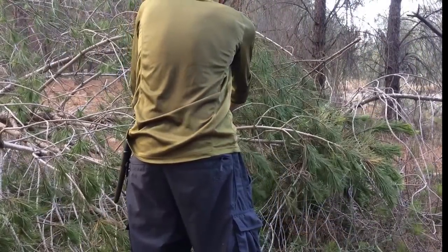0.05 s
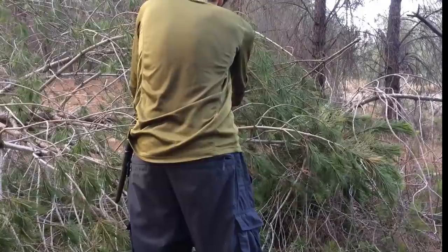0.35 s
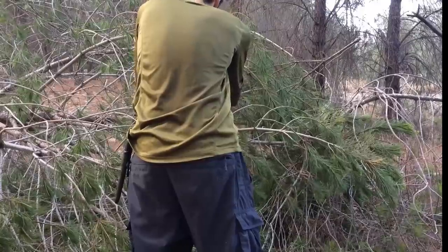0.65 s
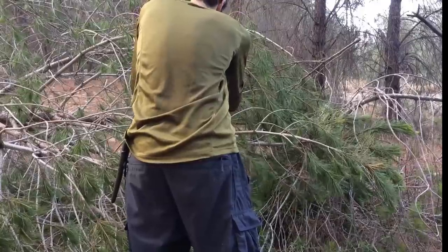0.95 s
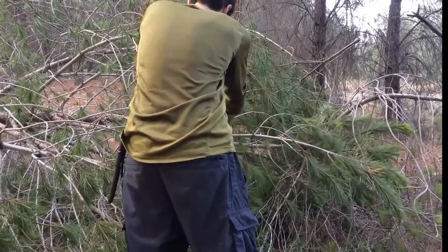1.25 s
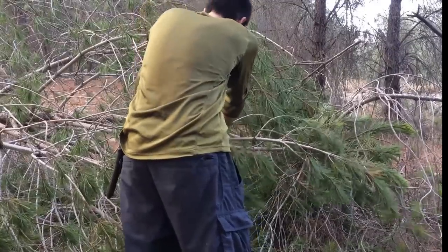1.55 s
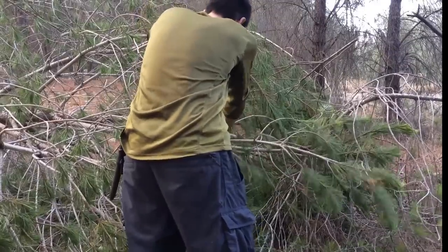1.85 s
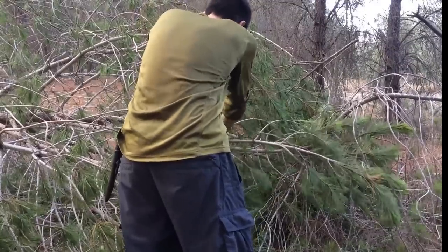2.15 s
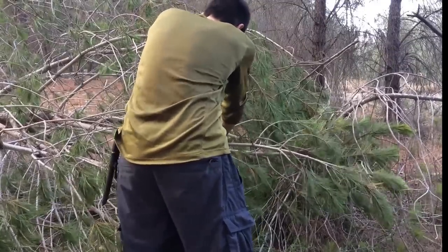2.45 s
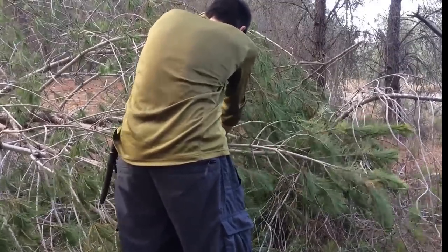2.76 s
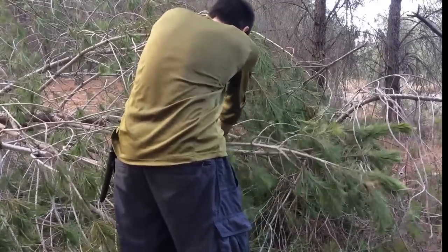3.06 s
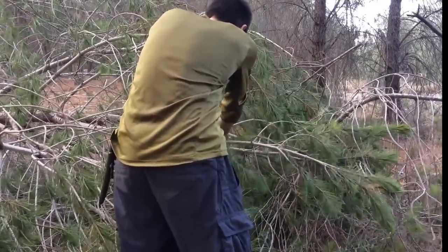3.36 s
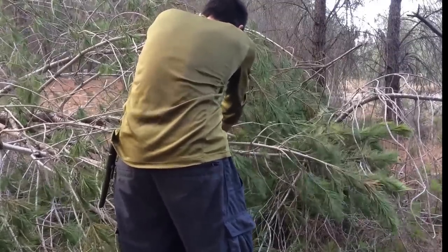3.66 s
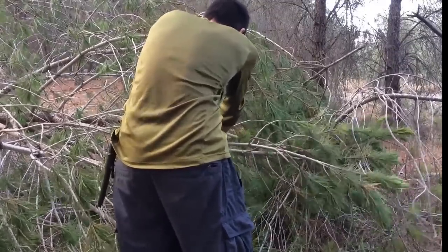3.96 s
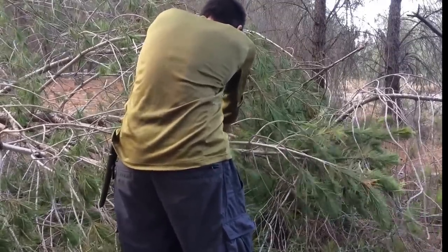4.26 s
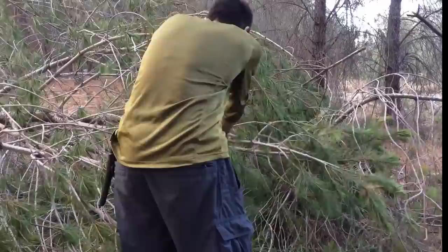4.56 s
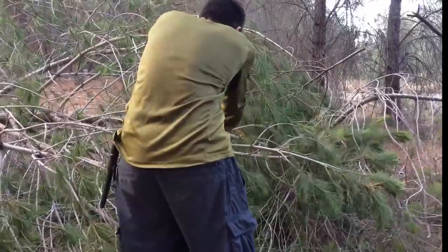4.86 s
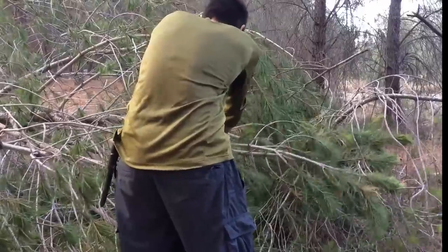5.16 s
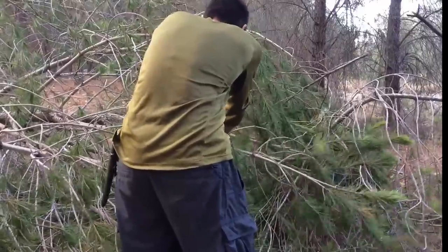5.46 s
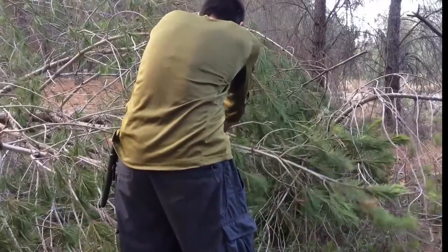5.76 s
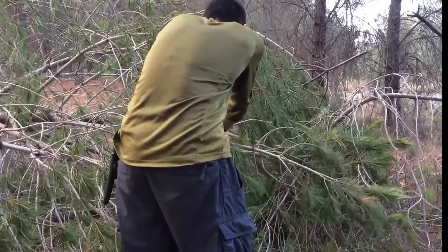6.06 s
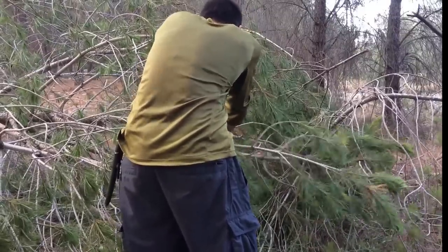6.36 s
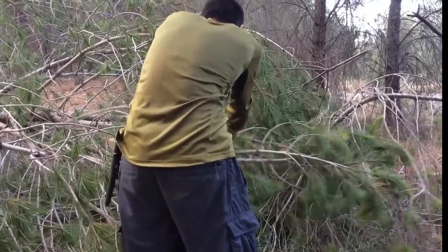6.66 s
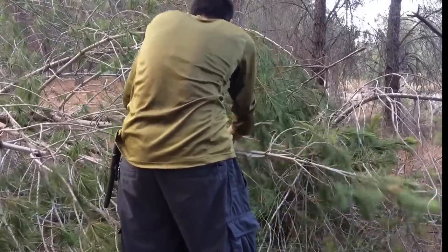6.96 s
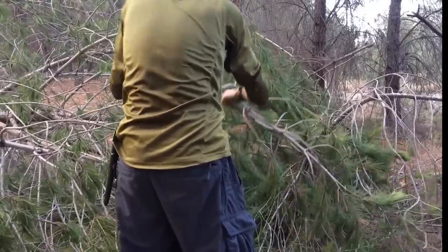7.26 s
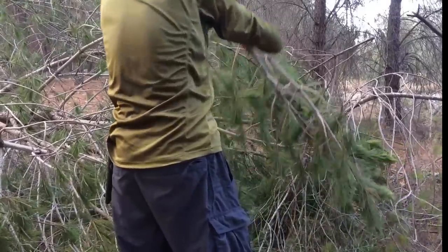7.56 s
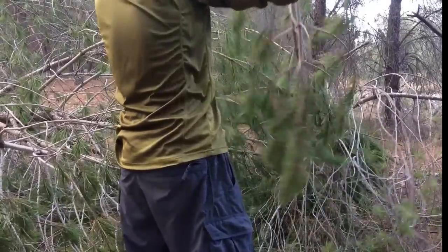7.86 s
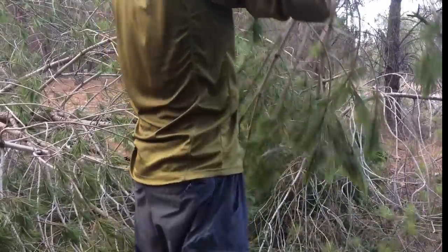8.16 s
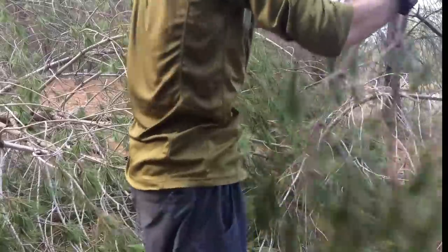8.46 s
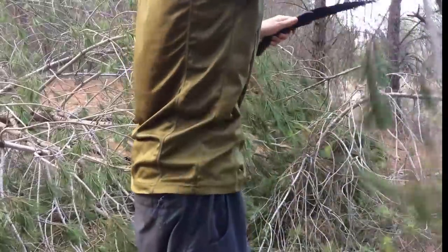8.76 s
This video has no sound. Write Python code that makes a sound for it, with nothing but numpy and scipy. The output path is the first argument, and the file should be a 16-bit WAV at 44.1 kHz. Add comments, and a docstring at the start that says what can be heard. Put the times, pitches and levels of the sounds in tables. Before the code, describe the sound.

Quick, ringing saw strokes cut wood outdoors, with one sharp crack, then twigs tick and needles rustle as the branch is swung aside.

```python
"""In a forest, a few metres away, a folding saw cuts a green pine branch in quick pushes and pulls.
Its teeth tear the wood fibres and make the blade ring. The branch cracks, comes free with a knock,
then is lifted and swung, with ticking twigs and rustling needles. Trunks and brush scatter the
sounds of the wood and two faint bird whistles, over a distant rumble, roar and hum."""
import sys
import numpy as np
from scipy import signal
from scipy.fft import rfft, irfft
from scipy.io import wavfile
from scipy.ndimage import uniform_filter1d

SR = 44100
rng = np.random.default_rng(int(sys.argv[2]) if len(sys.argv) > 2 else 0)


def bounce(signal):
    """Save signal as a 16-bit WAV file at the path given by the first command-line argument."""
    frames = np.transpose(np.atleast_2d(signal))
    limited = np.clip(frames, -1, 1)
    pcm = np.round(limited * 32767).astype(np.int16)
    wavfile.write(sys.argv[1], SR, pcm)


N = 388962
T = np.arange(N) / SR
TOP_HZ = 15350  # upper edge of the treble

# saw strokes, and one faint rustle just after the crack:
# start/s, end/s, level/dB, bite at entry (0-1), depth/dB (+ in solid wood, - near the bark)
STROKES_AND_RUSTLE = [ (1.16, 1.315, -47.5, .03, -3.5), (1.598, 1.705, -48, 0.16, -5),
                      (1.751, 1.882, -47.5, .08, -2.5), (1.953, 2.057, -43.5, 0.42, -0.5),
                      (2.118, 2.226, -44.5, 0.42, -5), (2.325, 2.444, -48.5, 0.78, 3),
                      (2.482, 2.593, -51.5, 0.16, 0.5), (2.684, 2.805, -48, 0.77, 4),
                      (2.851, 2.964, -50.5, 0.5, 1.5), (3.078, 3.195, -50, .7, 3.5),
                      (3.225, 3.345, -55, 0.5, 2.5), (3.459, 3.574, -55, 1, 3), (3.618, 3.73, -55, 0.26, 1),
                      (3.896, 4.002, -47, 0.57, -1.5), (4.052, 4.17, -56, 0.15, 4.5),
                      (4.276, 4.364, -52, 0.21, 4), (4.405, 4.508, -50, 0.15, 2),
                      (4.690, 4.797, -49.5, 0.66, -0.5), (4.848, 4.959, -55.5, .1, 2),
                      (5.109, 5.232, -58, 0.17, 4), (5.270, 5.366, -51, 0.34, 0),
                      (5.680, 5.744, -59, .05, -0.5), (6.216, 6.318, -46, 0.049, 1.5),
                      (6.363, 6.462, -48.5, 0.61, -0.5), (6.561, 6.627, -47, 1, -1),
                      (6.707, 6.769, -44.5, 0.14, -19)]


def undb(db):
    """Turn decibels into a gain to multiply by."""
    return 10 ** (np.asarray(db) / 20)


def unit(x):
    """Scale x to an average (rms) level of 1."""
    return x / np.sqrt(np.mean(x ** 2))


def add(out, start_s, x):
    """Mix x into out from the given time."""
    i = int(start_s * SR)
    out[i:i + len(x)] += x[:N - i]


def convolve(x, response):
    """Pass x through a filter, given as its response to one click."""
    return signal.fftconvolve(x, response)[:len(x)]


def colour(points, size=8192):
    """Make a filter's click response, with energy 1, from a tone curve of (f/Hz, level/dB) points."""
    hz, db = np.transpose(points)
    bin_hz = np.maximum(np.arange(size // 2 + 1) * SR / size, 1)
    gain = undb(np.interp(np.log(bin_hz), np.log(hz), db))
    cepstrum = irfft(np.log(gain))
    # fold the second half onto the first, so nothing sounds before the click
    cepstrum[1:size // 2] *= 2
    cepstrum[size // 2 + 1:] = 0
    response = irfft(np.exp(rfft(cepstrum)))
    return response / np.linalg.norm(response)


def resonate(x, hz, width):
    """Keep the band around hz; the narrower it is, the longer it rings."""
    w = 2 * np.pi * min(hz, TOP_HZ) / SR
    a = np.sin(w) * width / (2 * hz)
    return signal.lfilter([a, 0, -a], [1 + a, -2 * np.cos(w), 1 - a], x + 1e-18)


def walk(per_s):
    """A smooth random drift, about 1 in size."""
    hold = int(SR / per_s)
    steps = np.repeat(rng.standard_normal(N // hold + 1), hold)[:N]
    return unit(uniform_filter1d(steps, hold))


def grains(per_s, spread_db):
    """Tiny clicks of uneven size at random times."""
    size = undb(spread_db * np.minimum(rng.exponential(size=N), 5))
    return unit((rng.random(N) < per_s / SR) * size * rng.choice([-1, 1], N))


def background(roar_db=-68.5, air_db=-74):
    """A low rumble, a far roar that narrows in tone as it swells, and the hiss of still air."""
    # tone curves of the three sounds: f/Hz, level/dB
    rumble_tone = [(18, -29), (32, -21.5), (50, -2), (80, 1.5), (125, -4.5), (170, -10.5), (250, -17.5),
                   (350, -20), (480, -39.5), (900, -50)]
    roar_tone = [(150, -18), (300, 1), (450, 1), (570, -1), (720, -5.5), (830, -10), (1150, -17),
                 (1700, -25.5), (3000, -43.5)]
    air_tone = [(300, -7.5), (900, 6.5), (1800, -1), (3200, -4), (5000, -7), (10000, -13), (15500, -33)]
    # the rumble's slow rise and fall: t/s, level/dB
    rumble_levels = [(0, -50.5), (5.0, -51), (7.4, -50), (8.6, -45.5), (8.82, -48)]
    # swells of the roar: t/s at the top, level/dB, half length/s
    swells = [(3.301, -66, 0.69), (3.74, -58, 0.26), (5.95, -64.5, 0.66), (8.501, -67.5, 0.72)]
    tones = (rumble_tone, roar_tone, roar_tone, air_tone)
    rumble, roar, surge, air = (convolve(rng.standard_normal(N), colour(tone)) for tone in tones)
    rumble_db = np.interp(T, *np.transpose(rumble_levels)) + 1.5 * walk(12)
    swell = np.sqrt(sum(undb(db) ** 2 * np.exp(-((T - s) / half) ** 2) for s, db, half in swells))
    roar = undb(roar_db) * roar + swell * unit(resonate(surge, hz=550, width=650))
    return rumble * undb(rumble_db) + roar * undb(1.2 * walk(22)) + undb(air_db) * air


def drone(hz=352, width=60):
    """A low, wavering hum comes and goes, perhaps from a far road."""
    # strength of the hum: t/s, level/dB
    levels = [(0, -78), (4.5, -75), (5.7, -72.5), (6.8, -71), (7.15, -65), (7.7, -71), (8.82, -66.5)]
    hum = resonate(resonate(rng.standard_normal(N), hz, width), hz, width)
    return undb(np.interp(T, *np.transpose(levels))) * unit(hum)


def stirring(breeze_db=-85, shake_db=-65.5, settle_s=0.5):
    """How hard the needles move: a breeze stirs them, sawing shakes them, big moves swell and fade."""
    # the branch sags, drops, is dragged free and swung aside: t/s, level/dB, rise/s, fall/s
    moves = [(5.52, -64, .03, 0.18), (6.74, -60.5, 0.22, 0.37), (7.84, -56, 0.27, 0.11),
             (7.785, -51, .004, 0.15), (8.04, -59.5, .05, 0.17), (8.24, -56, 0.033, 0.076),
             (8.43, -63.5, 0.039, 0.027), (8.68, -57, 0.18, 0.84)]
    moving = sum(1. * ((T > start) & (T < end)) for start, end, *_ in STROKES_AND_RUSTLE)
    carry = np.exp(-1 / (settle_s * SR))
    shaking = signal.lfilter([1 - carry], [1, -carry], moving)
    power = undb(breeze_db) ** 2 + undb(shake_db) ** 2 * shaking
    for s, db, rise, fall in moves:
        power += (undb(db) * np.exp(-np.maximum((s - T) / rise, (T - s) / fall))) ** 2
    return np.sqrt(power)


def needles(hard_db=-54):
    """Needles brush each other, brighter when brushed hard; dry ones crackle, most when dragged."""
    # tone curve of the rustle: f/Hz, level/dB
    needle_tone = [(560, -31), (830, 1), (1440, -2.5), (1940, -2.5), (2340, -3.5), (2620, -2), (12200, -4),
                   (15500, -9)]
    crackle_db = np.interp(T, [7.5, 8.05], [-13, -3])
    brush = grains(per_s=12000, spread_db=1.8) + undb(crackle_db) * grains(per_s=340, spread_db=3.5)
    strength = stirring()
    rustle = strength * undb(1.2 * walk(30)) * convolve(brush, colour(needle_tone))
    brightness = 0.6 * np.minimum(strength / undb(hard_db), 1)
    return rustle + brightness * resonate(rustle, hz=12000, width=9800)


def birds():
    """Faint, wavering whistles fall in pitch, blurred by distance."""
    # bird calls: t/s, length/s, first f/Hz, last f/Hz, level/dB
    whistles = [(0.033, .10, 3490, 2510, -73), (7.51, .24, 1657, 1410, -66)]
    out = np.zeros(N)
    for start, length, from_hz, to_hz, db in whistles:
        progress = np.clip((T - start) / length, 0, 1)
        hz = from_hz + (to_hz - from_hz) * progress + 55 * walk(900)
        loudness = undb(db - 0.5 + 2.1 * walk(70)) * np.sin(np.pi * progress)
        out += loudness * np.sin(2 * np.pi * np.cumsum(hz) / SR)
    return out


def fracture(decay_s, splinters, size=4096):
    """Wood gives way: one sharp click, then a fading burst of splinters."""
    burst = splinters * rng.standard_normal(size) * np.exp(-T[:size] / decay_s)
    burst[0] = 1
    return burst


def twigs():
    """Thin twigs tick brightly, thick ones knock."""
    # twig hits: t/s, peak level/dB, f/Hz, width/Hz, decay/s
    hits = [(.868, -53.5, 6500, 5000, .001), (.985, -59, 5000, 8000, 0.023),
            (1.412, -46.5, 9000, 9000, .0018), (1.548, -35.5, 5800, 11100, 0.00048),
            (3.461, -45, 4210, 8000, .0018), (3.650, -43, 9040, 8000, .001),
            (6.370, -39, 8000, 9000, 0.0027), (6.563, -30.5, 7900, 12100, 0.004),
            (6.820, -45.5, 1510, 2990, 0.0062), (7.211, -37, 5170, 3000, 0.00083),
            (7.268, -41, 9300, 1500, 0.0023), (7.590, -40.5, 3460, 2500, .0008),
            (7.775, -27, 5500, 12000, 0.0037), (7.779, -36, 895, 1500, 0.014),
            (7.782, -28.5, 1860, 700, 0.0017), (7.822, -43, 1000, 1500, .0042),
            (8.056, -36, 7800, 10000, 0.0014), (8.18, -36.5, 1700, 4000, .0049),
            (8.198, -39.5, 1100, 2000, 0.0059), (8.248, -41, 4930, 12000, 0.0064),
            (8.285, -43, 9000, 9000, 0.0048), (8.33, -41.5, 990, 1100, 0.0024),
            (8.756, -38, 10900, 8000, .004)]
    out = np.zeros(N)
    for s, db, hz, width, decay in hits:
        hit = resonate(fracture(decay, splinters=0.35), hz, width)
        add(out, s, undb(db) * hit / np.abs(hit).max())
    return out


def saw(tooth_hz=520, fastest_share=0.48, catch_s=0.005, usual_stroke_db=-48):
    """Each stroke catches, speeds up and stops; the teeth tear fibres, which rings blade and wood."""
    # teeth snag in the cut and set the blade singing: t/s, level/dB, length/s
    snags = [(1.634, -43.5, 0.012), (2.001, -30.5, .0034), (2.159, -52, 0.0029), (2.687, -43, .0022),
             (3.16, -45, 0.0041), (4.731, -45, 0.0065), (6.606, -40, .0029), (6.736, -38, .005)]
    # ringing notes of the wood around the cut, and of the steel blade: f/Hz, width/Hz, level/dB
    wood_notes = [(780, 150, -13), (990, 90, -7), (1234, 33, -3), (1432, 213, 1), (1522, 107, -6),
                  (1926, 237, -1.5), (2350, 180, -5.5)]
    blade_notes = [(2803, 139, 2.5), (3060, 320, -2.5), (3480, 180, -11), (3610, 106, -7.5),
                   (3880, 120, -12), (6100, 290, -9.5)]
    # tone curve of tearing fibres: f/Hz, level/dB
    rasp_tone = [(400, -12), (900, -7.5), (2500, 3), (3800, -11), (4500, 4.5), (6500, 0), (8000, 1),
                 (11000, 1.5), (15500, -1)]
    ring, speed, force, rasp_gain, wood_gain = np.zeros((5, N))
    ring_spans = []
    for start, end, db, bite, depth_db in STROKES_AND_RUSTLE:
        span = slice(int(start * SR), int(end * SR))
        travel = np.interp(T[span], [start, start + fastest_share * (end - start), end], [0, .5, 1])
        speed[span] = np.sin(np.pi * travel)
        swell = speed[span] ** 1.51
        # a blade already pressed into the cut bites at once, with a brief extra push
        catch = 0.91 + 0.95 * bite * np.exp((start - T[span]) / catch_s)
        press = swell + bite * (1 - swell) * (travel < .5) * catch
        force[span], wood_gain[span] = undb(db) * press, undb(depth_db)
        # tearing grows more slowly than ringing, and a deep cut muffles it
        rasp_gain[span] = undb(-51 + 0.47 * (db - usual_stroke_db) - 0.22 * depth_db) * press
        ring_spans.append(slice(span.start, span.stop + SR // 50))
    snag = sum(undb(db) * np.exp(-((T - s) / length) ** 2) for s, db, length in snags)
    # each passing tooth makes one fading pulse of tiny clicks
    teeth_per_s = tooth_hz * (.3 + .7 * speed) * np.exp(.2 * walk(150))
    tooth_phase = np.cumsum(teeth_per_s) / SR % 1
    tooth_pulse = np.exp(-tooth_phase / 0.84)
    tearing = unit(tooth_pulse * grains(per_s=14000, spread_db=0.2) * undb(1.65 * walk(170)))
    wood_drive = force * wood_gain + 0.084 * snag
    blade_drive = force * undb(-1.5) + snag
    for notes, drive in ((wood_notes, wood_drive), (blade_notes, blade_drive)):
        for hz, width, db in notes:
            # the contact point slides along the blade, so each note grows and fades
            push = tearing * drive * undb(db + walk(45))
            # bend and grip change from stroke to stroke
            for span, (bend, grip) in zip(ring_spans, rng.standard_normal((len(ring_spans), 2))):
                ring[span] += undb(1.5 * grip) * resonate(push[span], hz * (1 + 0.032 * bend), width)
    rasp = convolve(tearing * (rasp_gain + 0.22 * snag), colour(rasp_tone))
    return undb(5.5) * ring + undb(-6) * rasp


def crack(snap_db=2.5, ring_db=2.0):
    """Bundles of fibres break one after another; the damp green wood rings only briefly."""
    # breaking bundles: t/s, level/dB, splinter decay/s
    breaks = [(5.4286, -25.5, 0.0027), (5.4317, -25.5, 0.0046), (5.4472, -37, 0.0043),
              (5.457, -36.5, 0.0091), (5.4655, -14.5, 0.0011), (5.4661, -15.5, 0.0036),
              (5.4689, -8, 0.00062), (5.472, -18, 0.0041), (5.481, -44, 0.0018), (5.483, -25.5, 0.002)]
    # ringing notes of the branch: f/Hz, width/Hz, level/dB
    branch_notes = [(1030, 105, -1), (1304, 88, -5), (1530, 46, 0), (2165, 220, 4.5), (2700, 45, -7),
                    (2950, 51, -10), (3240, 86, 5), (3730, 130, -6), (4200, 61, -8), (5600, 41, 6),
                    (5980, 61, 8), (6900, 170, -10), (7340, 32, -9), (8000, 41, -10)]
    # tone curve of snapping wood: f/Hz, level/dB
    snap_tone = [(150, -37), (420, -7), (800, -8), (1100, 3.5), (1650, -0.5), (2100, -0.5), (3400, 2),
                 (7000, -3.5), (11000, -2), (15500, -7.5)]
    push = np.zeros(N)
    for s, db, decay in breaks:
        add(push, s, undb(db) * fracture(decay, splinters=0.33))
    ring = sum(undb(db) * resonate(push, hz, width) for hz, width, db in branch_notes)
    return undb(snap_db) * convolve(push, colour(snap_tone)) + undb(ring_db) * ring


def knock(start_s=6.871, db=-47, contact_s=0.0051):
    """The cut end slips off the stump with a short, pitched clack."""
    # ringing notes of the cut end: f/Hz, width/Hz, level/dB
    end_notes = [(940, 400, -9), (1390, 350, -3), (1790, 240, -1), (2040, 150, 0), (2490, 150, -0.5),
                 (2900, 220, 0), (3570, 170, 3.5)]
    out, t = np.zeros(N), T[:SR // 16]
    free_s = np.maximum(t - contact_s, 0)  # the notes fade only once the contact ends
    for hz, width, note_db in end_notes:
        note = np.sin(2 * np.pi * (hz * t + rng.random()))
        add(out, start_s, undb(db + note_db) * np.exp(-np.pi * width * free_s) * note)
    return out


def bumps():
    """The heavy end of the branch bumps the pile with short, dull thuds."""
    # thuds: t/s, level/dB, f/Hz, decay/s
    thuds = [(7.780, -31.5, 178, 0.0055), (7.7812, -35, 756, 0.0036), (7.822, -43.5, 630, .005),
             (8.180, -43.5, 398, .007)]
    out, t = np.zeros(N), T[:SR // 8]
    for s, db, hz, decay in thuds:
        add(out, s, undb(db) * np.exp(-t / decay) * np.sin(2 * np.pi * hz * t))
    return out


def forest(x, near_db=-9, near_s=0.013, far_db=-23.5, far_s=0.076, echo_count=4):
    """Ground and brush scatter the sound at once; the trunks send back a thin, longer echo."""
    t, out = T[:SR // 2], x
    for k in range(echo_count):
        near, far = rng.standard_normal((2, len(t))) * (t > .002)
        near = resonate(near, hz=6000, width=30000) * np.exp(-t / near_s)
        far = resonate(far, hz=5400, width=13000) * np.exp(-t / far_s)
        echo = undb(near_db) * near / np.linalg.norm(near) + undb(far_db) * far / np.linalg.norm(far)
        # several echoes fade in turn, so the scatter stays diffuse with no steady ringing tones
        turn = np.cos(2 * np.pi * (1.3 * T + k / (2 * echo_count))) * np.sqrt(2 / echo_count)
        out = out + convolve(x * turn, echo)
    return out


def scene():
    """Saw, wood and birds echo among the trees; needles, hum and background join them in one channel."""
    wood = saw() + crack() + knock() + bumps() + twigs()
    return (forest(wood + birds()) + needles() + drone() + background())[None]


def record(dry):
    """A steep filter cuts the treble above TOP_HZ."""
    return signal.sosfilt(signal.ellip(8, .2, 70, TOP_HZ, fs=SR, output="sos"), dry)


dry = scene()
out = record(dry)
bounce(out)
```